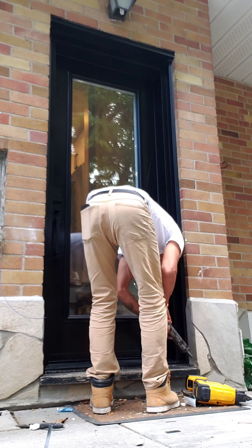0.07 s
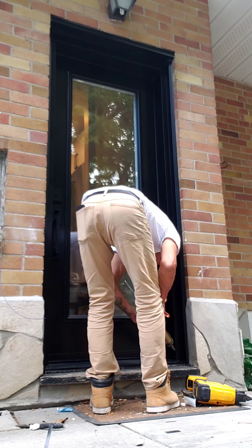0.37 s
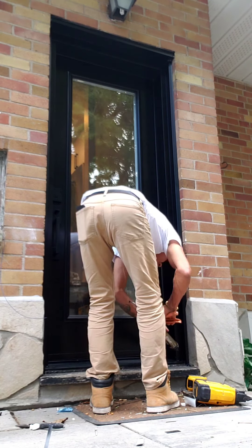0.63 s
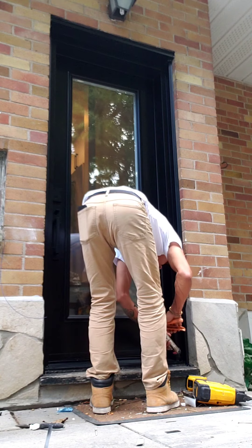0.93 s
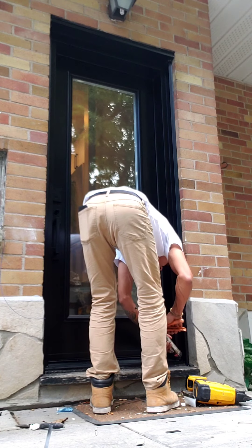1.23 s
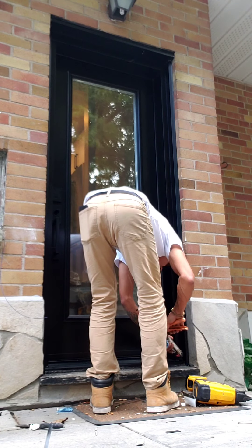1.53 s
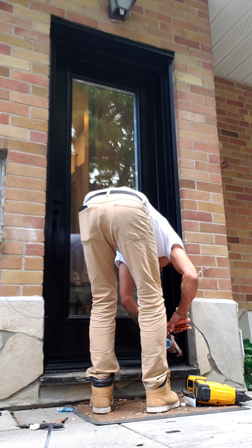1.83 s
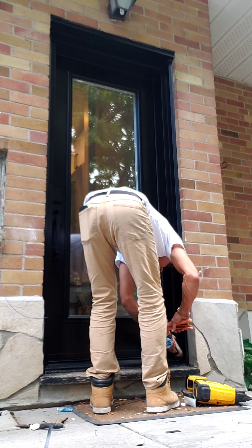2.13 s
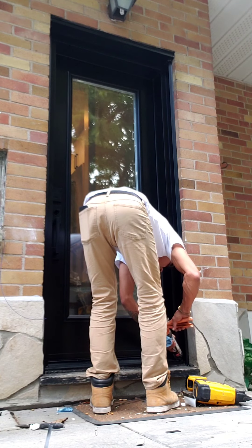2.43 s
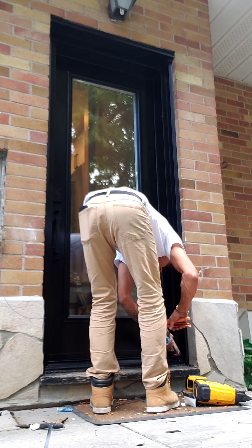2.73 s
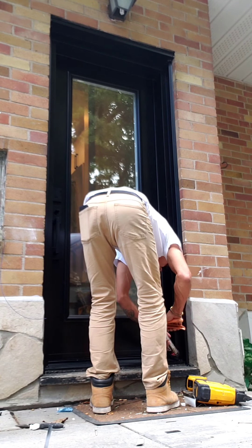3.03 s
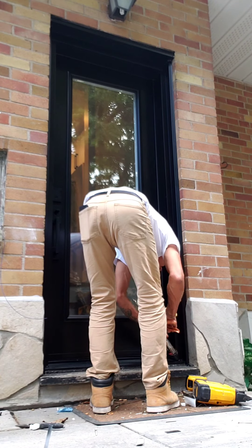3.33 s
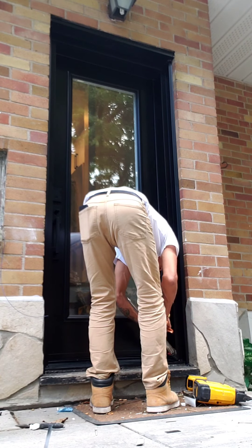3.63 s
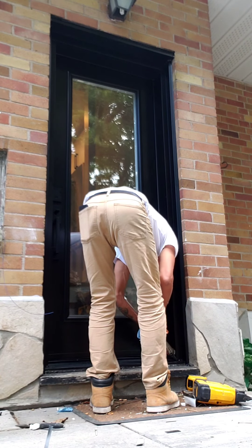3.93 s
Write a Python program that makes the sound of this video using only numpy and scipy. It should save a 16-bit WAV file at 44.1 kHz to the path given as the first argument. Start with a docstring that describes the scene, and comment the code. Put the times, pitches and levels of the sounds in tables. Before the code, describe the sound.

Two quick metallic clacks come from a caulking gun handled outdoors, the second louder. Wind then thumps on the microphone twice, the later gust stronger, while the trigger ticks faintly over soft hiss and far-off traffic.

```python
"""A steel clack and rattle, then a louder one: the rod and catch plate of a caulking gun, handled at a door
in a brick porch. Later its trigger ticks faintly as the gun is pressed to the frame. Distant traffic
rumbles under a steady hiss. Two gusts buffet the stereo microphone, mostly its right port; the second
reaches the left port too."""
import sys
import numpy as np
from scipy import signal
from scipy.fft import rfft, irfft, next_fast_len
from scipy.io import wavfile
from scipy.ndimage import uniform_filter1d, map_coordinates

SR = 44100
rng = np.random.default_rng(int(sys.argv[2]) if len(sys.argv) > 2 else 0)


def waveform_to_disk(signal):
    """Save audio, clipped to [-1, 1], as 16-bit WAV at the path in sys.argv[1]."""
    frames = np.transpose(np.atleast_2d(signal))
    scaled = np.clip(frames, -1, 1) * 32767
    samples = np.round(scaled).astype(np.int16)
    wavfile.write(sys.argv[1], SR, samples)


N = 176400


def amp(db):
    """Decibels as a gain."""
    return 10 ** (np.asarray(db) / 20)


def along(points, hz):
    """Each column of (f/Hz, value, ..) points, interpolated on a log frequency axis."""
    f, *cols = np.transpose(points)
    return np.array([np.interp(np.log(hz + 1), np.log(f + 1), c) for c in cols])


def level(points):
    """Gain per sample from (t/s, level/dB) points."""
    return amp(np.interp(np.arange(N) / SR, *np.transpose(points)))


def unit(x, axis=None):
    """x scaled to rms 1."""
    return x / np.sqrt(np.mean(x ** 2, axis=axis, keepdims=True) + 1e-20)


def pan(db):
    """Stereo gains with the left db above the right."""
    return amp([[db / 2], [-db / 2]])


def filtered(x, response):
    """x through a frequency response."""
    m = next_fast_len(N + SR // 2)
    return irfft(rfft(x, m) * response(np.fft.rfftfreq(m, 1 / SR)), m)[..., :N]


def noise(colour):
    """Unrelated left and right noise of the given colour, rms 1 overall."""
    return unit(filtered(rng.standard_normal((2, N)), lambda hz: amp(along(colour, hz))))


def wobble(db, per_s):
    """A gain that sways smoothly at random by about db."""
    knots = rng.standard_normal(int(N * per_s / SR) + 4)
    return amp(db * map_coordinates(knots, [np.arange(N) * per_s / SR]))


def burst(t, attack, t60):
    """A quick rise and an exponential decay, times in seconds."""
    return (1 - np.exp(-t / attack)) * amp(-60 * t / t60)


def add(out, s, sound):
    """Mix a sound in at time s."""
    part = out[:, max(round(s * SR), 0):][:, :sound.shape[-1]]
    part += sound[..., :part.shape[-1]]


# colour of the far street: f/Hz, relative left/dB, relative right/dB
TRAFFIC_COLOUR = [(22, -40, -20), (39, -3.5, -9.5), (55, -11, 3), (85.5, -25, -0.5), (115, -17, -0.5),
                  (159.6, -27, -12.5), (242, -25, -15), (386, -19.5, -22.5), (502, -21.5, -27.5),
                  (777, -27, -37), (1227, -26, -35.5), (1940, -35.5, -49.5), (4960, -42, -52.5)]
# its strength at the porch: t/s, level/dB
TRAFFIC_LEVEL = [(0, -41.5), (.6, -44.5), (1.2, -43), (2, -44.5), (3, -44), (4, -45)]
# how closely it moves in step at the two microphone ports: f/Hz, correlation
TRAFFIC_CORRELATION = [(60, 0.96), (130, 0.91), (300, 0.83), (700, 0.44), (1400, 0.1)]
def traffic():
    """A distant traffic rumble whose bass moves in step at both ports but is much louder on the right."""
    def mid_side_gains(hz):
        angle = np.arccos(np.clip(along(TRAFFIC_CORRELATION, hz)[0], -1, 1)) / 2
        return np.array([np.cos(angle), np.sin(angle)])

    mid, side = filtered(rng.standard_normal((2, N)), mid_side_gains)
    rumble = filtered(np.array([mid + side, mid - side]), lambda hz: amp(along(TRAFFIC_COLOUR, hz)))
    return unit(rumble) * level(TRAFFIC_LEVEL) * wobble(db=.6, per_s=5.57)


# colour of the outdoor hiss: f/Hz, relative left/dB, relative right/dB
HISS_COLOUR = [(300, -39, -2), (1230, -5, -5), (2360, 2, -11.5), (4700, 2, -11.5), (7620, 0.5, -16),
               (8360, -11.5, -15), (9440, -9.5, -6), (11600, -2, -12.5), (13500, -13, -8.5),
               (14500, -31, -37.5)]
# its strength at the microphone: t/s, level/dB
HISS_LEVEL = [(0, -59.5), (1.3, -58.5), (2.2, -58), (2.9, -57.5), (3.45, -56.5), (4, -59.5)]
def hiss():
    """Smooth outdoor hiss around the porch, stronger on the left."""
    return noise(HISS_COLOUR) * level(HISS_LEVEL) * wobble(db=.35, per_s=4.75)


# wind strength at each port: t/s, level/dB
WIND_LEFT = [(0, -83), (3.1, -59), (3.34, -58), (3.41, -45), (3.52, -45), (3.62, -36.5), (3.7, -43),
             (3.78, -43.5), (3.87, -40.5), (3.92, -35.5), (4, -33)]
WIND_RIGHT = [(0, -67), (1.15, -54), (1.25, -36.5), (1.4, -31), (1.53, -31.5), (1.6, -35.5), (1.85, -58),
              (3.198, -57), (3.213, -31), (3.31, -26), (3.44, -34.5), (3.515, -28), (3.57, -21),
              (3.65, -25.5), (3.71, -24.5), (3.87, -21), (3.925, -28.5), (4, -20)]
# colour of the buffeting: f/Hz, relative left/dB, relative right/dB
BUFFET_COLOUR = [(20.1, 3, -26.5), (35.8, -3, 3.5), (59, -25, 2.5), (111, 14, -1.5), (192, -4, -13),
                 (299, -8, -29.5), (440, -28, -43.5), (676, -41, -52), (1500, -69, -78)]
def wind():
    """Gusts right on the microphone: lumpy turbulence, separate at each port, with flutter on the left."""
    strength = np.array([level(WIND_LEFT), level(WIND_RIGHT)])
    lumps = np.array([wobble(db=1.5, per_s=40) for _ in range(2)])
    gusts = unit(noise(BUFFET_COLOUR) * lumps, axis=1) * strength
    gusts[0] += flutter(strength[0]) * lumps[0]
    return gusts


# colour of air fluttering across the left port: f/Hz, relative level/dB
FLUTTER_COLOUR = [(200, -20), (300, -2), (385, 0.5), (430, -13), (480, -7), (600, -15.5), (800, -28.5),
                  (1200, -43), (2500, -75)]
# puffs that drive it: t/s, boost/dB (scaled by the puff's envelope), length/s
PUFFS = [(3.669, 8, .012), (3.836, 7, .012), (3.882, 12.5, .014), (3.914, 14.5, 0.014), (3.956, 5, 0.0082)]
def flutter(strength, attack_s=.0014):
    """In strong wind the air across the left port flutters, in puffs."""
    t, boost_db = np.arange(N) / SR, np.zeros(N)
    for s, db, length in PUFFS:
        age = np.maximum(t - s, 0)
        boost_db += db * (1 - np.exp(-age / attack_s)) * np.exp(-(age / length) ** 2)
    drive = (strength / amp(-34.5)) ** 2.3  # grows 2.3 dB per dB of wind
    return noise(FLUTTER_COLOUR)[0] * drive * amp(-36 + boost_db)


# the strongest eddies: t/s, peak push ahead of the port/dB, width/s
EDDIES = [(1.249, -26.5, 0.0013), (1.3123, -19.5, 0.0028), (1.346, -23, 0.002), (1.3811, -10.5, 0.0019),
          (1.41, -16, 0.0017), (1.431, -18.5, 0.0016), (1.473, -18.5, 0.0023), (1.527, -16.5, 0.0024),
          (3.234, -23.5, 0.0034), (3.2653, -16, 0.003), (3.2988, -19.5, 0.0026), (3.366, -17.5, 0.0024),
          (3.4835, -16, 0.0021), (3.5514, -12, 0.0016), (3.583, -20.5, 0.0036), (3.606, -17, 0.0016),
          (3.704, -18, 0.0015), (3.768, -16.5, 0.0022), (3.7922, -22.5, 0.0014), (3.8157, -19.5, 0.0013),
          (3.861, -20, 0.0026), (3.9572, -14, 0.0016)]
def eddies(low_hz=39.3, high_hz=362):
    """A passing eddy pushes and then sucks at the right port, which rebounds with a thump."""
    t, push = np.arange(N) / SR, np.zeros(N)
    for s, db, width in EDDIES:
        passage = np.clip((t - s) / width, -20, 20)
        push -= 2 * amp(db) * np.tanh(passage) / np.cosh(passage)
    port_band = lambda hz: 1j * hz / (1j * hz + low_hz) / np.hypot(1, (hz / high_hz) ** 4)
    return np.array([np.zeros(N), filtered(push, port_band)])


# decay between the brick walls: f/Hz, t60/s
PORCH_DECAY = [(1000, 0.3), (6000, .19), (12000, 0.2)]
def porch(x, build_up_s=.0029):
    """The walls around the microphone answer with a short tail whose treble dies first."""
    hz, t, spectrum = signal.stft(rng.standard_normal((2, SR // 2)), SR, nperseg=128)
    decay = burst(t, build_up_s, along(PORCH_DECAY, hz).T)
    tail = signal.istft(spectrum * decay, SR, nperseg=128)[1]
    tail /= np.linalg.norm(tail[0])
    return amp(-4) * pan(db=2.5) * signal.fftconvolve(x, tail, axes=1)[:, :N]


def bump(at_s=.198, width_s=.04, hz=158):
    """A soft, dull bump to the right, swelling and fading before the second clack."""
    t = np.arange(N) / SR - at_s
    return amp(-46) * pan(db=-15) * np.exp(-(t / width_s) ** 2) * np.sin(2 * np.pi * hz * t)


# ticks of the trigger: t/s, level/dB, t60/s, centre f/Hz, width/octaves
TRIGGER_TICKS = [(2.436, -49, .015, 13500, .3), (3.687, -40, 0.014, 12300, .16),
                 (3.7295, -34.5, 0.0067, 8500, 1), (3.7412, -44.5, .025, 10800, .35),
                 (3.8133, -37, 0.014, 11800, 0.2), (3.967, -41.5, .013, 12500, 0.47)]
def ticks(attack_s=.00029):
    """Tiny bright snaps of the trigger under load, just right of centre."""
    out, t = np.zeros((2, N)), np.arange(SR // 10) / SR
    for s, db, t60, centre_hz, octaves in TRIGGER_TICKS:
        band = lambda hz: 1 / (1 + (np.log2((hz + 1) / centre_hz) / octaves) ** 2)
        snap = unit(filtered(rng.standard_normal((2, N)), band))[:, :len(t)]
        add(out, s, amp(db) * pan(db=-1.5) * snap * burst(t, attack_s, t60))
    return out


def steel_mode(t, hz, t60, pan_db, attack_s=.0015, blur_rad=.85, blur_per_s=130):
    """One ringing mode of the gun; its loose parts chatter against each other and blur the phase."""
    knots = np.arange(len(t) // 100) / blur_per_s
    start_phase = 2 * np.pi * rng.random((2, 1))
    blur = blur_rad * np.interp(t, knots, rng.standard_normal(len(knots)))
    return pan(pan_db) * burst(t, attack_s, t60) * np.sin(2 * np.pi * hz * t + start_phase + blur)


# contacts of rod and catch plate: t/s, plate gain/dB, rod gain/dB, scrape gain/dB, knock gain/dB
CONTACTS = [(.001, -34, -58, -34, -51), (.009, -47, -52, -36.5, -51), (.025, -46, -58, -47, -52),
            (0.044, -49, -61, -53, -50.5), (.066, -50, -64, -53, -53), (0.2961, -37, -66, -48, -64),
            (0.299, -23, -51, -32.5, -63), (0.3064, -42, -51, -38, -52), (0.3124, -41, -52, -37, -46),
            (0.318, -44, -50, -41, -36), (0.325, -44, -52, -35, -42), (.333, -50, -47, -48, -51),
            (.344, -54, -55, -58, -49), (0.4163, -57, -58, -60, -54)]
# modes of the steel catch plate: f/Hz, relative level/dB, t60/s, left over right/dB
PLATE_MODES = [(6300, -13.5, 0.031, 10), (6500, -18, 0.025, 14), (6950, -14, 0.018, 13),
               (7110, -3.5, 0.019, 12), (7195, -6.5, 0.023, 13), (7350, -9.5, 0.029, 10),
               (13600, -11, .04, -2), (14080, -9, .045, 0), (14300, -8.5, .045, 0)]
# colours of the rod's scrape and the frame's knock: f/Hz, relative left/dB, relative right/dB
SCRAPE_COLOUR = [(1500, -3, -28), (3060, -3.5, -4), (4900, 0.5, -0.5), (6200, 8, -3), (8000, -3.5, -3),
                 (9150, 1, 3), (12500, 4, 3), (14300, 3, 3)]
KNOCK_COLOUR = [(150, 0, -5), (650, -2, 0.5), (1000, 1, 7.5), (1740, 3, -10), (2490, -4, -9),
                (4160, 1.5, -16), (7900, -34, -39)]
def clacks(attack_s=.00023):
    """The gun at the door: every contact rings plate and rod, scrapes the rod and knocks the frame."""
    out, t = np.zeros((2, N)), np.arange(SR // 4) / SR
    scrapes, knocks = noise(SCRAPE_COLOUR), noise(KNOCK_COLOUR)
    for s, plate_db, rod_db, scrape_db, knock_db in CONTACTS:
        plate = sum(amp(db + rng.normal(0, 1.4)) * steel_mode(t, hz, t60, pan_db)
                    for hz, db, t60, pan_db in PLATE_MODES)
        rod = steel_mode(t, hz=5440, t60=.075, pan_db=8.5)
        piece = rng.integers(N - len(t)) + np.arange(len(t))
        scrape = scrapes[:, piece] * burst(t, attack_s, t60=.045)
        knock = knocks[:, piece] * burst(t, attack_s, t60=.035)
        ring = amp(plate_db) * plate + amp(rod_db) * rod
        add(out, s, ring + amp(scrape_db) * scrape + amp(knock_db) * knock)
    return out


def scene():
    """The gun in the porch, the street behind it and the wind on the microphone."""
    rattle, trigger = clacks(), ticks()
    walls = porch(rattle + amp(-3) * trigger)
    return traffic() + hiss() + wind() + eddies() + walls + bump() + trigger + rattle


def record(dry, duck_above_hz=1200, duck_from_db=-28, window_s=.023, low_cut_hz=40, top_hz=14600):
    """The recorder ducks the left treble when wind loads that port, and cuts deep bass and the very top."""
    bass = filtered(dry[0], lambda hz: 1 / (1 + (hz / duck_above_hz) ** 2) ** 2)
    treble = dry[0] - bass
    load = np.abs(uniform_filter1d(bass ** 2, int(window_s * SR))) / amp(duck_from_db) ** 2
    left = bass + treble / np.sqrt(1 + load)
    passband = lambda hz: (hz < top_hz) * hz ** 2 / np.hypot(hz ** 2, low_cut_hz ** 2)
    return filtered(np.array([left, dry[1]]), passband)


dry = scene()
out = record(dry)
waveform_to_disk(out)
```